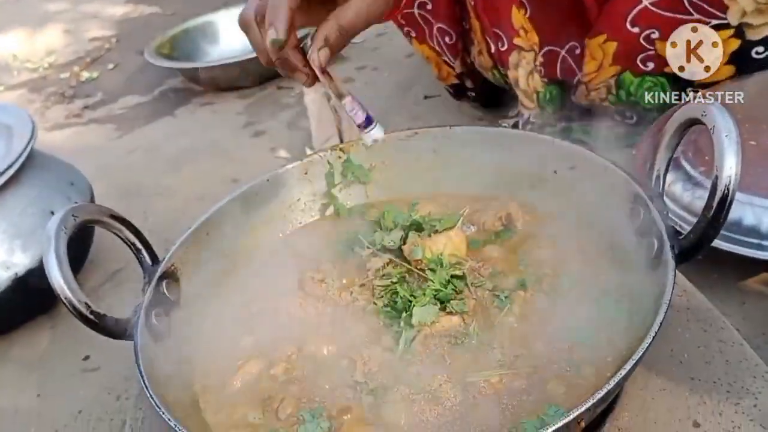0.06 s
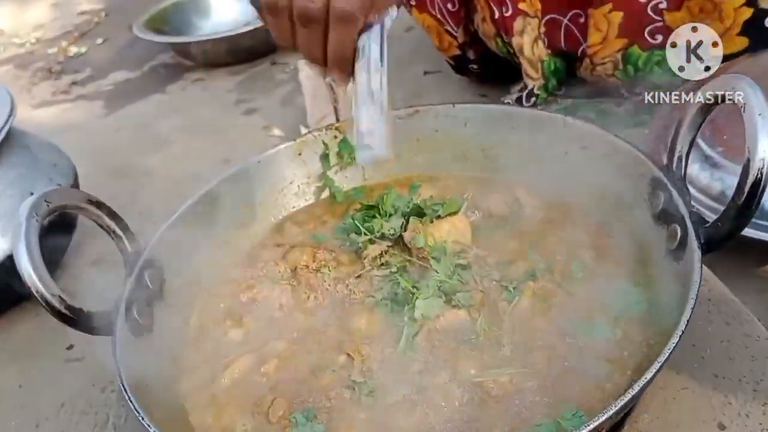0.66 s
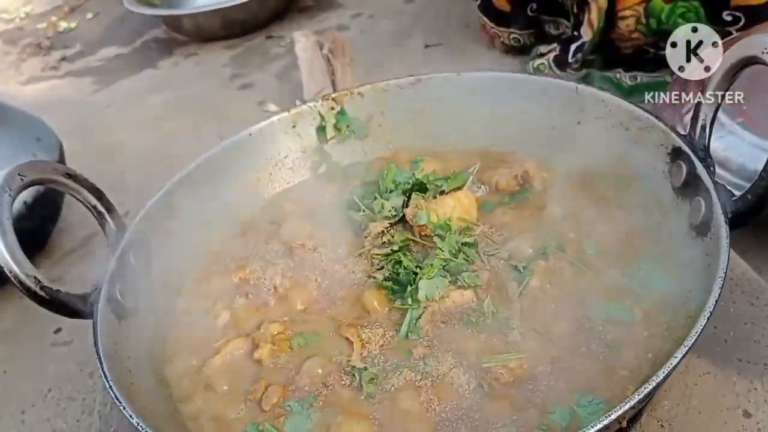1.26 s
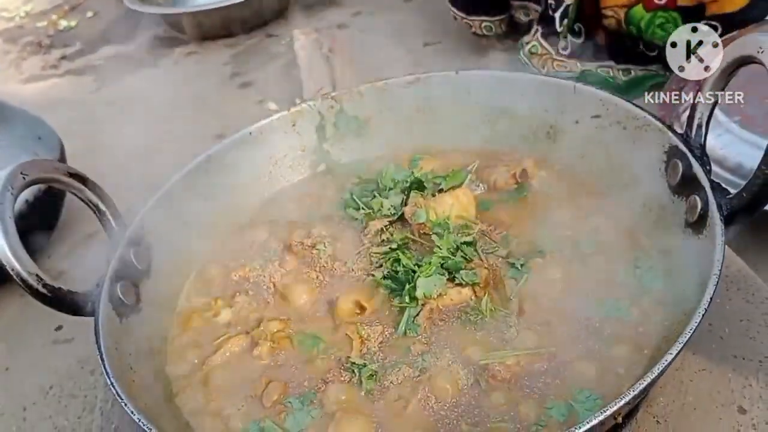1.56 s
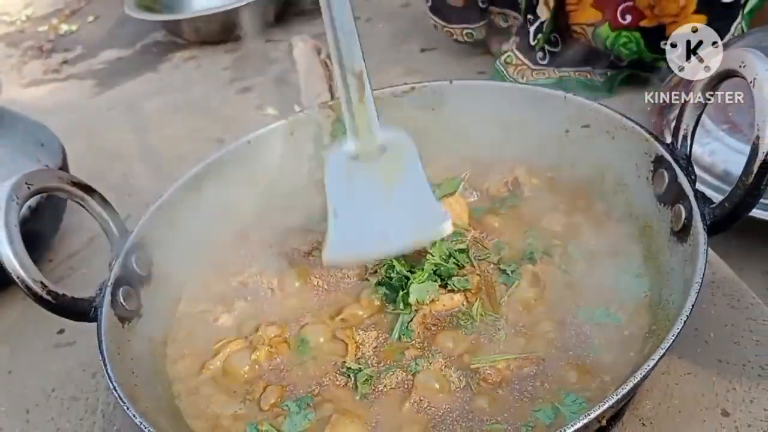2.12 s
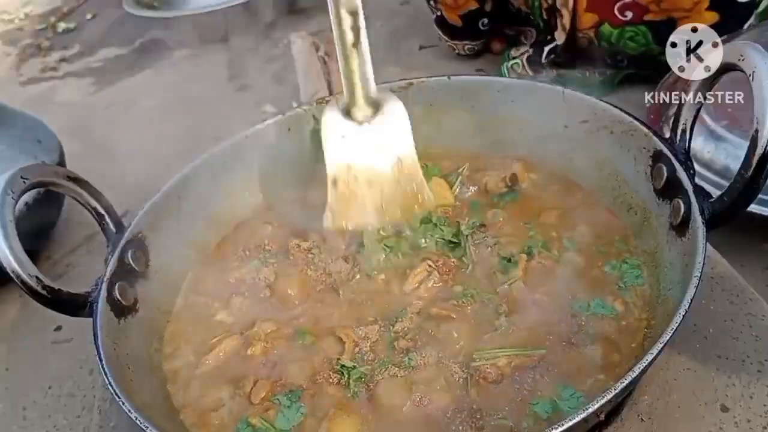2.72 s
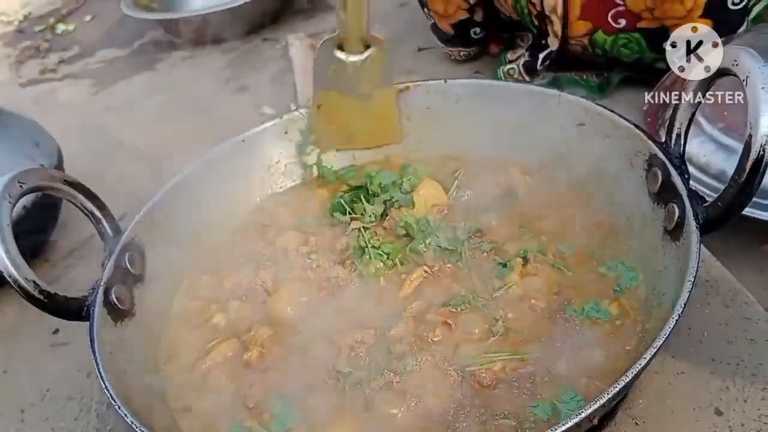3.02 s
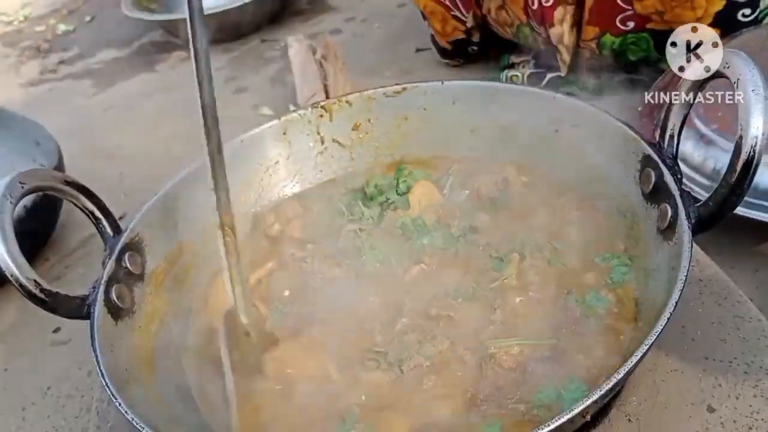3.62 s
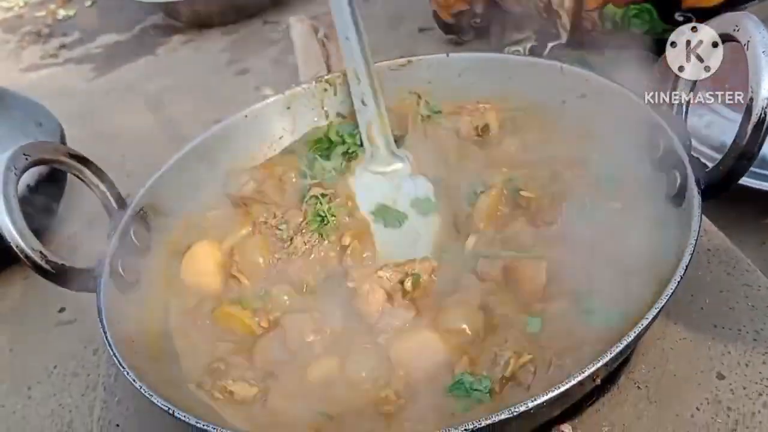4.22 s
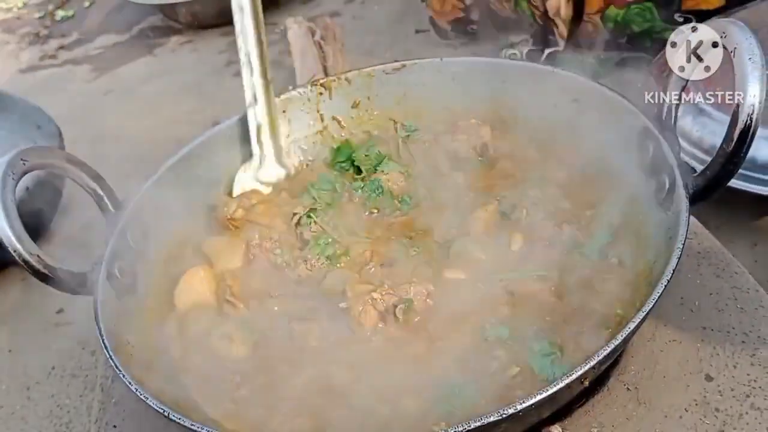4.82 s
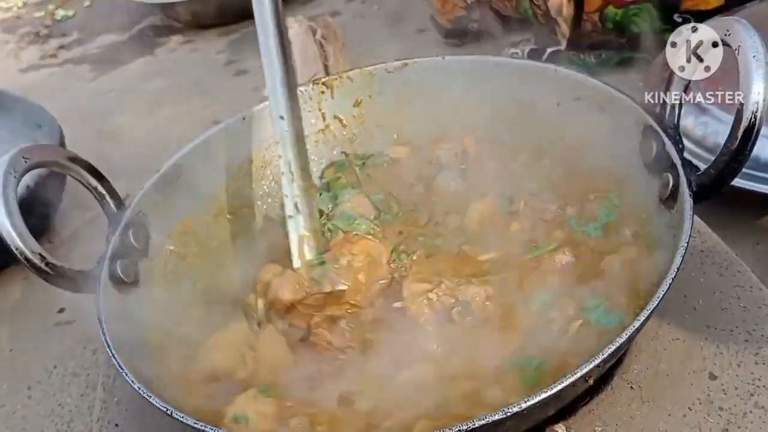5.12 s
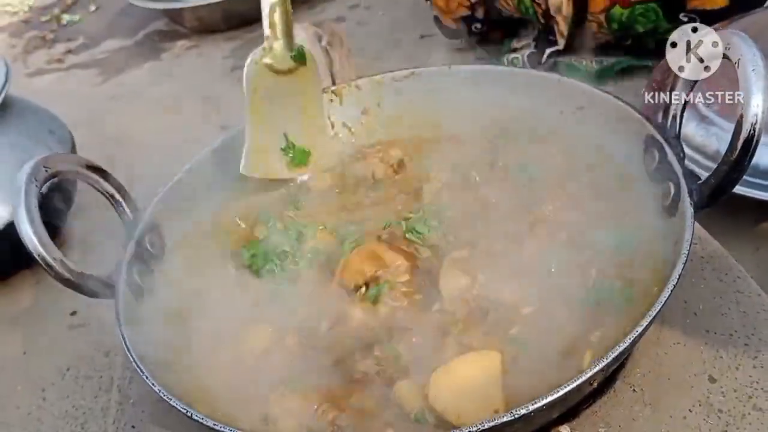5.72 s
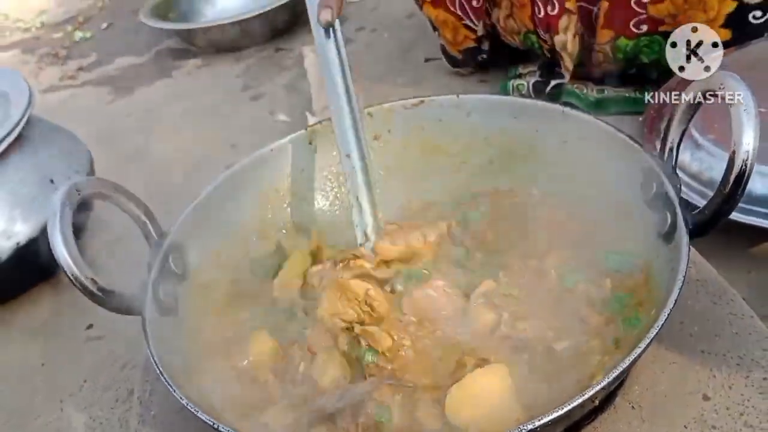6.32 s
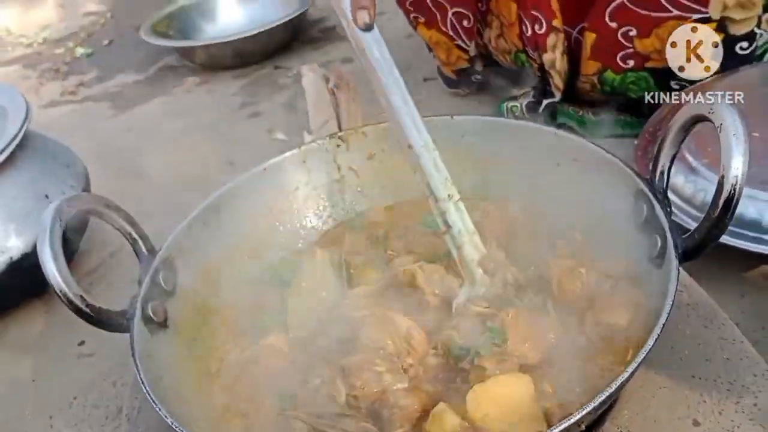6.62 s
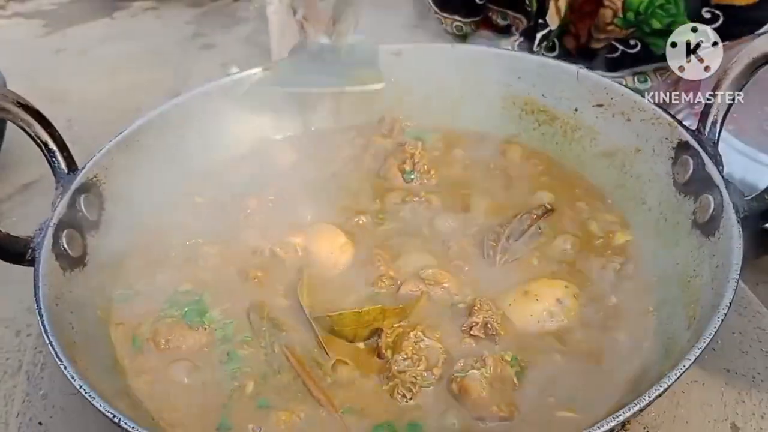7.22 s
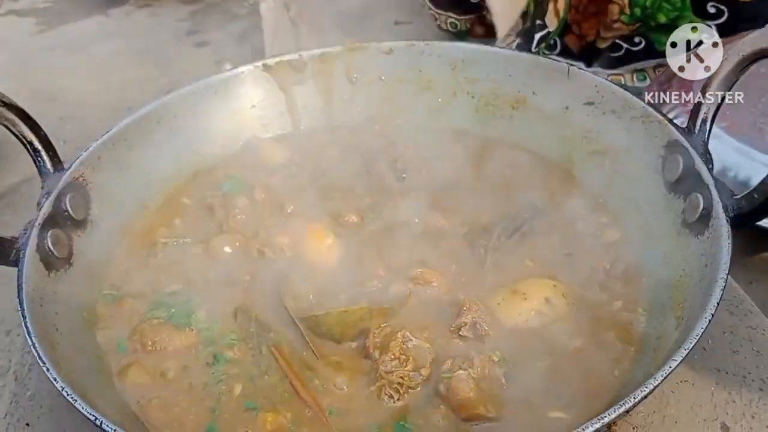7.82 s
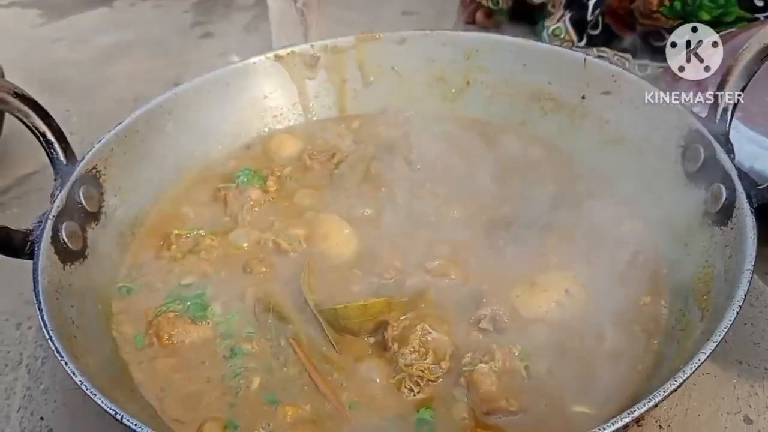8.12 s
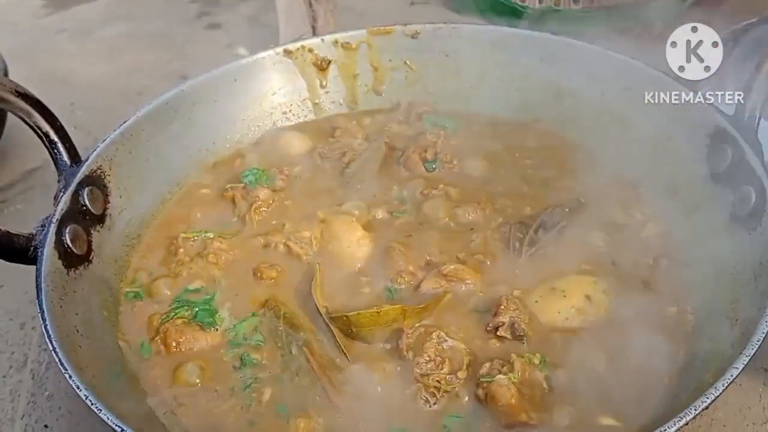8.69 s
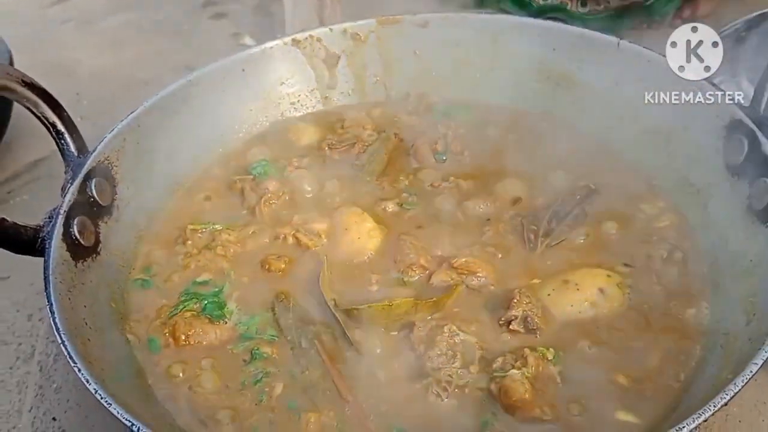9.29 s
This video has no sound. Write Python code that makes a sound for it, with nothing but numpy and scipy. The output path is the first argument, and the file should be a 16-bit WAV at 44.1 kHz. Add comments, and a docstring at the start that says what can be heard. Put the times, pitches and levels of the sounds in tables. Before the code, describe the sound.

Close outdoor boiling of curry, with wet pops, scraping spatula strokes and a few ringing clanks on the pan before it settles.

```python
"""Outdoors, close to a metal pan of thick, boiling curry: bubbles pop, steam glugs and fat sizzles.
A foil spice sachet crinkles, then a steel spatula scrapes through the curry until the boil settles.
The spatula is knocked and dragged on the rim, its blade rings on, and a quiet simmer remains.
Each bubble is a tiny tone that swells and dies; the metal rings with several fading tones at once."""
import sys
import numpy as np
from scipy import signal
from scipy.io import wavfile
from scipy.ndimage import uniform_filter1d, map_coordinates

SR = 44100
rng = np.random.default_rng(int(sys.argv[2]) if len(sys.argv) > 2 else 0)


def wrap_up_sound(samples):
    """Save the sound to the file named by the first command line argument, as 16-bit audio."""
    columns = np.atleast_2d(samples).T
    # keep every value between -1 and 1, then stretch to whole-number steps
    tamed = np.clip(columns, -1, 1)
    steps = np.round(tamed * 32767).astype(np.int16)
    wavfile.write(sys.argv[1], SR, steps)


N = 421155
TIME = np.arange(N) / SR


def gain_of(db):
    """Turns decibels into a number to multiply a sound by."""
    return 10 ** (np.asarray(db) / 20)


def evened(x):
    """Scales a sound to an average (rms) level of 1."""
    return x / np.sqrt(np.mean(x ** 2) + 1e-20)


def steadied(x, span=0.22):
    """Holds the average level near 1 over every stretch of span seconds."""
    width = int(span * SR / 2)
    power = uniform_filter1d(uniform_filter1d(x ** 2, width), width)
    return x / np.sqrt(abs(power) + 1e-12)


def curves(rows):
    """Turns rows that begin with a time into one curve for each other column."""
    times, *columns = np.transpose(rows)
    return [np.interp(TIME, times, column) for column in columns]


def add(mix, start, sound):
    """Mixes a sound in at start seconds."""
    part = mix[max(round(start * SR), 0):][:len(sound)]
    part += sound[:len(part)]


def gesture(start, length, attack_s, release_s):
    """A level that rises toward 1 and dies away once length seconds are over."""
    rise = np.clip((TIME - start) / attack_s, 0, 1)
    return rise * np.exp(-np.clip((TIME - start - length) / release_s, 0, 20))


def wander(per_s):
    """A random curve that heads for a new value per_s times a second."""
    knots = rng.standard_normal(N // 16)
    return evened(np.interp(TIME * per_s, np.arange(len(knots)), knots))


def clicks(per_s, spread_db):
    """Clicks at random times, most small and a few large."""
    size = gain_of(spread_db * np.minimum(rng.exponential(1, N), 3.5))
    return size * rng.choice([-1, 1], N) * (rng.random(N) < per_s / SR)


def coloured(x, colour, tilt_db=0):
    """Filters a sound by rows of (Hz, dB); tilt_db per octave brightens it around 2 kHz."""
    octave = np.log2(abs(np.fft.fftfreq(2048, 1 / SR)) + 1)
    hz, db = np.transpose(colour)
    shape_db = np.interp(octave, np.log2(hz), db) + tilt_db * np.clip(octave - 11, -2, 2)
    log_gain = np.log(gain_of(shape_db))
    taps = np.fft.ifft(np.exp(np.conj(signal.hilbert(log_gain)))).real  # never rings ahead of a click
    return signal.oaconvolve(x, taps)[:len(x)]


def shifting(x, depth_db, width_hz, span, size=512):
    """Bands of pitch swell and fade every span seconds as gaps and cavities change shape."""
    frames = dict(nperseg=size, noverlap=size * 3 // 4)
    hz, t, spectrum = signal.stft(x, SR, **frames)
    grid = np.meshgrid(hz / width_hz, t / span, indexing="ij")
    patches = map_coordinates(rng.standard_normal((120, 240)), grid, order=1, mode="wrap")
    spectrum = spectrum * gain_of(depth_db * np.clip(evened(patches), -2, 1.8))
    return signal.istft(spectrum, SR, **frames)[1][:len(x)]


def resonate(x, hz, width_hz):
    """Keeps the part of a sound near the moving pitch hz."""
    turn = np.exp(2j * np.pi * np.cumsum(hz) / SR)
    decay = np.exp(-np.pi * width_hz / SR)
    return 2 * (turn * signal.lfilter([(1 - decay) ** 2], [1, -2 * decay, decay ** 2], x / turn)).real


def resonances(peaks):
    """Turns broad peaks (Hz, width in Hz, dB) into a colour for filtering."""
    hz = np.geomspace(20, SR / 2, 600)
    power = sum(gain_of(db) ** 2 / (1 + ((hz - centre) / width) ** 2) ** 2
                for centre, width, db in peaks)
    return np.transpose([hz, 10 * np.log10(power)])


def ring(tones, length=.5):
    """Fading tones, struck a little differently each time; t60 is the seconds to fade by 60 dB."""
    t = TIME[:int(length * SR)]
    return sum(gain_of(db + 2 * rng.standard_normal() - 60 * t / t60)
               * np.sin(2 * np.pi * hz * t) * rng.choice([-1, 1]) for hz, db, t60 in tones)


def answer(x, response, db):
    """The ringing or echo that a sound sets off, given the response to one click."""
    return gain_of(db) * signal.oaconvolve(x, response / np.linalg.norm(response))[:N]


def reflected(x, echo_db, t60, count=60):
    """Adds quick reflections between the walls of the pan and the ground."""
    delay = rng.uniform(0.00092, .04, count)
    echoes = np.zeros(SR // 8)
    echoes[(delay * SR).astype(int)] = rng.choice([-1, 1], count) * gain_of(-60 * delay / t60)
    return x + answer(x, echoes, echo_db)


def crack(colour, t60, tilt_db=0, uneven_db=3, rise_s=0.00076):
    """A burst of noise that dies quickly, coloured a little differently each time."""
    t = TIME[:SR // 3]
    noise = shifting(rng.standard_normal(2 * len(t)), uneven_db, width_hz=263, span=0.27)
    noise = evened(coloured(noise, colour, tilt_db)[len(t):])
    return noise * gain_of(-60 * t / t60) * (1 - np.exp(-t / rise_s))


def snaps(rows, colour, t60, level_db):
    """One short crack for each row of (seconds, dB)."""
    out = np.zeros(N)
    for start, db in rows:
        add(out, start, gain_of(db + level_db) * crack(colour, t60))
    return out


def bubble(hz, length, glide=0.043, roundness=2):
    """A bursting bubble swells, rings a few cycles and rises in pitch as it opens."""
    peak_s = length * np.sqrt(roundness / 8)
    age = np.arange(int(8 * length * SR)) / (SR * peak_s)  # 1 at the loudest moment
    pitch = hz * (1 + glide * (np.minimum(age, 6) - 1.5))
    swell = (age * np.exp(1 - age)) ** roundness
    return swell * np.sin(2 * np.pi * (np.cumsum(pitch) / SR + rng.random()))


def swarm(low_hz, high_hz, cycles, per_s, spread_db, clump_db, clumps_per_s,
          scatter=.15, sway=.22, roundness=2, sizes=40):
    """Bubbles burst in clumps; their size drifts together (sway) and varies one by one (scatter)."""
    bursts = clicks(per_s, spread_db) * gain_of(clump_db * np.clip(wander(clumps_per_s), -2, 1.6))
    smallness = .5 + sway * wander(clumps_per_s) + scatter * rng.standard_normal(N)
    kind = np.floor(smallness * sizes)
    moments = np.flatnonzero(bursts)
    out = np.zeros(N + SR)
    for k, hz in enumerate(np.geomspace(low_hz, high_hz, sizes)):
        blip = hz * bubble(hz, cycles * rng.uniform(0.44, 2.02) / hz, roundness=roundness)
        starts = moments[kind[moments] == k]
        samples = starts[:, None] + np.arange(len(blip))
        np.add.at(out, samples.ravel(), np.outer(bursts[starts], blip).ravel())
    return out[:N]


# The colour (balance of low and high) of the air. Each row: pitch in Hz, relative level in dB.
AIR_COLOUR = [(20, -15), (60, -12), (130, 9.5), (400, 1), (1000, -7), (2500, -14), (5000, -47.5),
              (10000, -41), (16000, -46.5)]
def still_air():
    """The faint, low hush of outdoor air."""
    return gain_of(-66) * evened(coloured(rng.standard_normal(N), AIR_COLOUR))


# Creases snapping. Each row: start in seconds, relative level in dB.
FOIL_SNAPS = [(.0483, -21.5), (.078, -19), (.1441, -17.5), (.1994, -12.5), (.2543, -15.5), (.2922, -18.5),
              (.376, -17), (.408, -16), (.575, -29), (.5811, -12.5), (.604, -9), (.663, -24), (.675, -13),
              (.7103, -14.5), (.853, -15.5)]
# The colour of the foil. Each row: pitch in Hz, relative level in dB.
FOIL_COLOUR = [(200, -38), (500, 9), (1500, 24.5), (3500, 11.5), (7500, 19.5), (11000, -6), (15000, -35)]
def sachet():
    """Thin foil snaps at its creases and rustles finely while it is shaken empty."""
    creases = clicks(per_s=1400, spread_db=9) * gain_of(5.3 * wander(68.6))
    creases = reflected(creases, echo_db=-9, t60=0.081)
    shake = gesture(start=0.2, length=0.647, attack_s=0.022, release_s=0.036)
    rustle = shake * steadied(coloured(creases, FOIL_COLOUR, tilt_db=1))
    return snaps(FOIL_SNAPS, FOIL_COLOUR, t60=0.028, level_db=-1.5) + gain_of(-41.5) * rustle


# Spits of fat. Each row: start in seconds, relative level in dB.
FAT_SPITS = [(1.2585, -23), (1.268, -33), (1.8377, -24), (2.0178, -25), (2.6569, -23), (2.9327, -34),
             (3.1607, -27.5), (3.235, -25.5), (3.9968, -33), (4.03, -27.5), (4.2188, -20), (4.297, -20),
             (5.6057, -27.5), (5.66, -26.5)]
def spitting_fat():
    """Hot fat spits in single bright snaps."""
    colour = [(200, -39), (800, 5), (2500, 6.5), (4300, -7.5), (6000, 7.5), (7700, 2),
              (10000, -18), (13000, -44)]
    return snaps(FAT_SPITS, colour, t60=0.026, level_db=5.5)


# The colour of the sizzle. Each row: pitch in Hz, relative level in dB.
SIZZLE_COLOUR = [(800, -45), (2000, -22.5), (3300, -2), (4300, -15), (5000, -0.5), (5900, 4.5), (6600, -6),
                 (7500, 8), (8500, -12), (10500, -15), (12500, -43.5), (15000, -44)]
def sizzling_fat():
    """Thousands of tiny, high bubbles blur into a sizzle."""
    fizz = swarm(2070, 15800, cycles=4.6, per_s=2100, spread_db=9, clump_db=5, clumps_per_s=80,
                 scatter=.25, sway=.1, roundness=3)
    return steadied(coloured(reflected(fizz, echo_db=-3, t60=0.092), SIZZLE_COLOUR))


# The colours of gurgle and rumble. Each row: pitch in Hz, relative level in dB.
GURGLE_COLOUR = [(180, -20.5), (280, -12), (370, -4.5), (520, 2.5), (800, 6), (1500, -49)]
RUMBLE_COLOUR = [(20, -27), (55, -7.5), (100, 1.5), (170, -7), (250, 0.5), (500, -27.5), (2000, -83.5)]
# Surges of sauce. Each row: start and length in seconds, gurgle and rumble levels in dB.
SAUCE_SURGES = [(0.31, 0.12, -39, -46), (0.7, 0.2, -35.5, -49), (1.496, 0.28, -40, -46),
                (1.852, 0.16, -39, -69), (2.446, 0.18, -46, -50), (2.74, .28, -47.5, -47.5),
                (3.19, 0.08, -37, -51), (3.767, 0.27, -36.5, -62), (4.167, 0.083, -32, -62),
                (4.246, 0.13, -32, -37), (4.403, .16, -50, -46.5), (4.742, 0.14, -33, -68),
                (6.17, 0.07, -71, -42), (6.407, 0.074, -38.5, -49), (6.796, 0.1, -39, -51)]
def heaving_sauce(gurgle_db, rumble_db):
    """Low bubbles gurgle and rumble, louder when the sauce heaves or slops back into a gap."""
    gurgle_power, rumble_power = gain_of(gurgle_db) ** 2, gain_of(rumble_db) ** 2
    for start, length, slop_db, heave_db in SAUCE_SURGES:
        swell = gesture(start, length, attack_s=0.038, release_s=0.0087)
        gurgle_power += (gain_of(slop_db) * swell) ** 2
        rumble_power += (gain_of(heave_db) * swell) ** 2
    gurgle = swarm(280.6, 874, cycles=2.87, per_s=450, spread_db=3.5, clump_db=2, clumps_per_s=30)
    rumble = swarm(35, 290, cycles=2.23, per_s=220, spread_db=3, clump_db=3.5, clumps_per_s=17)
    return (np.sqrt(gurgle_power) * steadied(coloured(gurgle, GURGLE_COLOUR))
            + np.sqrt(rumble_power) * steadied(coloured(rumble, RUMBLE_COLOUR)))


# Hollows in the sauce. Each row: start and length in seconds, level in dB, pitch in Hz.
SAUCE_HOLLOWS = [(.62, .25, -45, 406), (1.72, .4, -34, 768), (1.868, 0.12, -37, 350),
                 (2.136, .07, -42, 338), (2.617, 0.083, -47, 402), (2.82, .05, -44, 444),
                 (2.954, .06, -43.5, 430), (3.79, 0.12, -43, 350), (4.238, 0.18, -45, 410),
                 (4.453, 0.046, -42, 350)]
def hollows():
    """Pockets under the thick sauce ring low as it sputters over them."""
    out, sputter = np.zeros(N), clicks(per_s=500, spread_db=4.5)
    for start, length, db, hz in SAUCE_HOLLOWS:
        bursts = sputter[int(start * SR):][:SR]
        tone = steadied(resonate(bursts, np.full(len(bursts), hz), width_hz=82), span=0.18)
        swell = gesture(0, length, attack_s=0.032, release_s=.015)[:len(bursts)]
        add(out, start, gain_of(db) * tone * swell)
    return out


# The colour of the splutter. Each row: pitch in Hz, relative level in dB.
SPLUTTER_COLOUR = [(250, -21), (550, 0.5), (900, 7), (1800, 5.5), (2600, -1), (3400, -5.5), (4300, -19),
                   (6000, -16.5), (8000, -18), (11000, -41)]
def spluttering():
    """Films tear and droplets land: wet ticks too short to have a pitch."""
    ticks = swarm(900, 6000, cycles=1, per_s=1500, spread_db=6, clump_db=6, clumps_per_s=85,
                  scatter=.25, sway=.05, roundness=4)
    return steadied(coloured(reflected(ticks, echo_db=-12.5, t60=0.05), SPLUTTER_COLOUR))


# The colour of the simmer. Each row: pitch in Hz, relative level in dB.
SIMMER_COLOUR = [(300, -41), (750, 11.5), (1200, -2), (1700, -10), (2200, -13.5), (2700, -6.5), (3500, -17),
                 (6000, -22.5), (11000, -78)]
def simmering():
    """A weak boil makes only clusters of small, round blips."""
    blips = swarm(700, 3200, cycles=4.5, per_s=300, spread_db=4.5, clump_db=5, clumps_per_s=22,
                  scatter=.2, sway=.15, roundness=4)
    return steadied(coloured(reflected(blips, echo_db=-22.5, t60=0.12), SIMMER_COLOUR), span=0.36)


# The colour of the boil. Each row: pitch in Hz, relative level in dB.
BOIL_COLOUR = [(300, -29), (450, -22.5), (600, 3.5), (780, 10.5), (1200, 3.5), (1800, -4), (2400, 1),
               (3300, -15.5), (4200, -10.5), (6000, -62.5), (11000, -96.5)]
# How dense the boil is. Each row: time in seconds, the burble's share of the power from 0 to 1.
DENSE_SHARE = [(0, 0.75), (1.5, 0.79), (3, 0.72), (4.5, 0.25), (5.6, 0.12), (7, 0.067)]
def boiling():
    """A dense, wet burble slowly gives way to looser bubbles."""
    burble = swarm(416, 3660, cycles=1.78, per_s=1900, spread_db=7.5, clump_db=3, clumps_per_s=73,
                   scatter=.26, sway=.06)
    burble = shifting(reflected(burble, echo_db=-8.5, t60=0.086), depth_db=9, width_hz=266, span=.035)
    loose = swarm(382, 4410, cycles=3.94, per_s=1100, spread_db=4, clump_db=15, clumps_per_s=60,
                  scatter=.16, sway=.16)
    loose = reflected(loose, echo_db=-9, t60=0.082)
    share = curves(DENSE_SHARE)[0]
    return (np.sqrt(share) * steadied(coloured(burble, BOIL_COLOUR))
            + np.sqrt(1 - share) * steadied(coloured(loose, BOIL_COLOUR)))


def steam_spurts(depth_db=2.6, per_s=24):
    """A level that wavers around 1, as steam escapes in spurts with lulls between them."""
    return steadied(gain_of(depth_db * np.clip(wander(per_s), -2, 1.6)), span=.4)


# How hard the pan cooks: it boils, is stirred down and settles to a simmer.
# Each row: time in seconds, then relative levels of bubbling, gurgle and sizzle in dB.
COOKING_LEVELS = [(0, -29, -37, -43.5), (.25, -36.5, -42, -41.5), (.38, -31.5, -37.5, -40.5),
                  (.85, -32.5, -36.5, -44), (1.3, -31, -38.5, -46), (1.65, -37.5, -57, -53),
                  (1.85, -30, -45, -43), (2.2, -35, -57, -45), (2.42, -32.5, -61, -49.5),
                  (2.68, -31, -52, -48.5), (3.2, -32, -53.5, -43), (4.1, -34, -52, -50),
                  (4.3, -30, -64, -42), (4.65, -33.5, -48.5, -47.5), (5.6, -38, -52.5, -45),
                  (5.92, -39, -60.5, -52), (6.86, -37.5, -58, -43), (6.97, -55, -64, -55),
                  (8.4, -63.5, -73.5, -71), (9.55, -59.5, -65, -61.5)]
def cooking(blade_moving, smothered_share=0.42, full_boil_db=-32):
    """Blends the sounds of the boil; the moving blade puts out part of the bubbling and sizzle."""
    bubbling_db, gurgle_db, sizzle_db = curves(COOKING_LEVELS)
    calm = np.clip((-42 - bubbling_db) / 8, 0, 1)  # 0 is a boil, 1 is a simmer
    bubbles = np.sqrt(1 - calm) * boiling() + np.sqrt(calm) * simmering()
    bubbles = gain_of(bubbling_db) * (gain_of(0.33) * bubbles + gain_of(-7) * spluttering())
    sauce = heaving_sauce(gurgle_db, rumble_db=-55.5 + 0.59 * (bubbling_db - full_boil_db))
    sizzle = gain_of(sizzle_db) * sizzling_fat() * steam_spurts()
    undisturbed = np.sqrt(1 - smothered_share * blade_moving)
    return undisturbed * steam_spurts() * (bubbles + sizzle) + sauce


# The pan's thin metal tones. Each row: pitch in Hz, relative level in dB, undamped fade time in seconds.
METAL_TONES = [(790, -13, .07), (1172, -17, .06), (1625, -4, .07), (1733, -16, .09), (2104, -3, .09),
               (2616, -10, .1), (2765, -7, .08), (3143, -7, .05), (3256, -9, .05), (3736, -27, .12),
               (3858, -15, .06), (4377, -13, .07), (5511, -16, .07), (6245, -14, .07), (6982, -15, .06),
               (7600, -14, .06), (8484, -23, .06), (10480, -29, .15)]
def in_pan(x, fade_share=0.29):
    """What cooks in the pan also rings its metal, and the curry cuts that ringing short."""
    damped = ring([(hz, db / 2, t60 * fade_share) for hz, db, t60 in METAL_TONES], length=.1)
    return x + answer(x, damped, db=-12)


def lesser_bubbles(per_s=10, count=400):
    """Rows for pops(): bubbles that come by chance, as loud as the boil allows."""
    times = np.cumsum(rng.gamma(2, .5, count)) / per_s
    force, pitch, ringing = np.clip(rng.standard_normal((count, 3)), -2, 2).T
    db = np.interp(times, TIME, curves(COOKING_LEVELS)[0]) + 8.5 + 3.5 * force
    hz = 1250 * 2 ** (0.26 * pitch)
    cycles = 3.23 * 2 ** (.25 * ringing)  # about the same for all, so large, low ones last longer
    return np.transpose([times, db, hz, cycles / hz])[times < TIME[-1]]


# Big, slow pockets of steam under the sauce, and the bubbles that stand out on top.
# Each row: time of the peak in seconds, level in dB, pitch in Hz, rough length in seconds.
STEAM_GLUGS = [(.1, -39, 158, 0.018), (.79, -25, 386, 0.009), (1.945, -32, 383, 0.012),
               (2.2, -27, 770, 0.0068), (3.11, -36, 234, 0.013), (3.85, -29.5, 374, 0.0082),
               (4.365, -52, 260, 0.0045), (4.49, -32, 330, 0.011), (6.443, -21.5, 573, 0.01)]
LOUD_BUBBLES = [(0.0773, -8.5, 2100.0, 0.0011), (0.1197, -16.5, 1020, 0.0033), (0.1393, -17, 1840, 0.0028),
                (0.2015, -31, 1410, 0.0034), (0.2133, -15, 1460, 0.0017), (0.3015, -21, 1470, 0.0047),
                (0.3118, -12, 1040, 0.0023), (0.3305, -21.5, 890.0, 0.0025), (0.3832, -15, 1120, 0.002),
                (0.449, -15, 1470.0, 0.0034), (0.4793, -14, 1710.0, 0.0012), (0.507, -14, 1120, 0.0017),
                (0.6054, -18, 2320, 0.0018), (0.6364, -13.5, 1830.0, 0.0016), (0.6727, -13, 1980, 0.0024),
                (0.7846, -12, 1260, 0.0013), (0.8017, -12, 2100, 0.0042), (0.8566, -10, 1400.0, 0.0017),
                (0.8896, -14, 1530, 0.0017), (0.8975, -14.5, 1630, 0.0032), (1.0176, -13.5, 1770.0, 0.0031),
                (1.1466, -16, 1580, 0.0028), (1.2493, -16.5, 1170, 0.0017), (1.2612, -9.5, 1860, 0.0033),
                (1.2688, -3.5, 1820, 0.00096), (1.283, -16, 1900, 0.002), (1.345, -21.5, 1050, 0.004),
                (1.4407, -15, 1480, 0.0031), (1.4764, -11.5, 1060, 0.004), (1.5357, -12.5, 1130, 0.0029),
                (1.5461, -11.5, 1920, 0.0034), (1.5601, -19, 820.0, 0.0066), (1.7778, -13.5, 1350, 0.0015),
                (1.8391, -23, 1680, 0.0058), (1.9255, -15, 930.0, 0.0023), (1.94, -13.5, 950, 0.003),
                (1.9538, -24, 810, 0.011), (1.969, -23, 840, 0.011), (2.0647, -25, 930, 0.0038),
                (2.1506, -17, 1160, 0.0037), (2.1634, -15, 1030, 0.0045), (2.1781, -15.5, 1000, 0.0049),
                (2.2019, -14.5, 1530, 0.0025), (2.292, -14, 1320.0, 0.0013), (2.3095, -18, 1680, 0.0037),
                (2.4117, -12.5, 1250, 0.0033), (2.43, -12.5, 2450, 0.0019), (2.4823, -23, 730.0, 0.0071),
                (2.5627, -5, 1540, 0.0015), (2.6844, -16.5, 1870, 0.0015), (2.6997, -16.5, 1630, 0.0035),
                (2.7332, -19, 1670, 0.005), (2.793, -14, 1970, 0.0018), (2.8492, -15, 1680, 0.0018),
                (2.8631, -13.5, 1240, 0.0015), (2.9247, -18.5, 1550, 0.0032), (2.9428, -10.5, 1710, 0.0035),
                (3.0172, -11, 1590.0, 0.0038), (3.0919, -15.5, 1540, 0.0033),
                (3.2102, -13.5, 1630.0, 0.0022), (3.3544, -15.5, 1690, 0.0045), (3.3724, -13, 1540, 0.0024),
                (3.4101, -18, 2100, 0.0035), (3.6628, -30, 1730, 0.004), (3.6719, -19, 1690, 0.0072),
                (3.7963, -23, 1750, 0.0059), (3.8081, -20, 2050, 0.0031), (3.8341, -17, 1780, 0.0027),
                (3.8857, -16.5, 1320, 0.0028), (4.0984, -14.5, 1550, 0.0026), (4.1291, -12.5, 1080, 0.0037),
                (4.179, -18.5, 770.0, 0.0046), (4.1984, -9, 1340.0, 0.0021), (4.209, -16, 1360, 0.0015),
                (4.2258, -9, 1750, 0.0029), (4.2694, -7.5, 1170, 0.0024), (4.3188, -21.5, 1510, 0.013),
                (4.3515, -8.5, 1600.0, 0.002), (4.372, -19.5, 1480, 0.0014), (4.4978, -16, 1700, 0.0029),
                (4.5958, -17.5, 1020, 0.0019), (4.6044, -7.5, 2250, 0.0019), (4.6814, -16.5, 1264, 0.0072),
                (4.8461, -17, 1410, 0.0015), (4.858, -20, 1970, 0.0018), (4.8787, -14.5, 1140, 0.0021),
                (5.002, -13, 1000, 0.0035), (5.08, -13, 1530, 0.0014), (5.1187, -18, 1120, 0.0014),
                (5.2084, -15.5, 1140, 0.0041), (5.3434, -11.5, 1970, 0.0023), (5.3586, -8, 2020, 0.0024),
                (5.4003, -12, 1930, 0.0023), (5.5164, -17.5, 1140, 0.0053), (5.5563, -6, 1860, 0.0022),
                (5.7372, -21.5, 1850, 0.0032), (5.7587, -14.0, 2170.0, 0.0027),
                (5.7828, -10.5, 1590, 0.0026), (5.8049, -8, 2600, 0.00069), (5.92, -24.5, 1410, 0.006),
                (6.0223, -24, 1530, 0.0056), (6.0365, -15, 2660, 0.0016), (6.155, -20.5, 880, 0.0061),
                (6.2195, -2, 1770, 0.0019), (6.2425, -15, 1290, 0.0035), (6.2495, -11, 2240, 0.0015),
                (6.288, -15.5, 1610, 0.0012), (6.339, -4, 1443, 0.00147), (6.415, -14, 1010, 0.0014),
                (6.4526, -5.5, 1125, 0.0021), (6.623, -19, 960, 0.0033), (6.6409, -11.5, 1720, 0.0014),
                (6.7183, -20, 1730, 0.004), (6.7278, -19.5, 1770, 0.0037), (6.8003, -20, 840.0, 0.0056),
                (6.8522, -20, 1480, 0.0024), (6.8982, -14, 1360, 0.0022), (6.9063, -14, 2600, 0.0016),
                (7.0141, -37, 950, 0.0048), (7.0283, -35, 945, 0.0041), (7.041, -34, 950, 0.0032),
                (7.0543, -29, 1636, 0.011), (7.1042, -20, 2970, 0.0015), (7.1938, -26.5, 1750, 0.0029),
                (7.6759, -37, 1710, 0.004), (8.3778, -32.5, 1880, 0.0015), (8.4217, -31.5, 1620.0, 0.0016),
                (8.4327, -31.5, 2160.0, 0.0018), (8.4654, -43, 1700, 0.0041), (8.4866, -31.5, 1760, 0.008),
                (8.5344, -30.5, 1380, 0.0069), (8.543, -39, 1560, 0.0041), (8.5522, -32, 1370, 0.0051),
                (8.5792, -29, 1560, 0.0034), (8.787, -40, 2006, 0.003), (8.8302, -43, 1260, 0.0084),
                (8.9986, -20, 1940, 0.0023), (9.032, -46, 2090, 0.003), (9.0435, -38, 2050.0, 0.0043),
                (9.045, -43, 2740, 0.0064), (9.1216, -45, 2180, 0.0036), (9.127, -38.5, 2480, 0.005),
                (9.145, -40, 1390, 0.0081), (9.158, -46, 2550, 0.0075), (9.1629, -39, 1600, 0.0033),
                (9.174, -37, 1580, 0.006), (9.1801, -29, 1940.0, 0.002), (9.232, -45, 2520, 0.005),
                (9.2551, -33, 1140, 0.0043), (9.2668, -28, 1230, 0.0067), (9.276, -35, 1250, 0.004),
                (9.296, -41, 1960, 0.005), (9.309, -42, 1400, 0.0031), (9.344, -41, 1900, 0.0059),
                (9.379, -33.5, 1530, 0.0035), (9.392, -41.5, 1460, 0.003)]
def pops(rows, flutter_db, tear_s=.0006):
    """Each large bubble flutters as its skin thins, tears with a tick and echoes briefly in the pan."""
    out = np.zeros(N)
    for peak_s, db, hz, length in rows:
        length = max(length, 2 / hz)  # at least two cycles
        force_db = db + 0.38 * min(db + 13.5, 0)  # gentle bubbles burst with less spatter
        tone = bubble(hz, length, glide=0.0043, roundness=6)
        add(out, peak_s - length * np.sqrt(3) / 2, gain_of(db) * tone)
        tick = bubble(2500 * rng.uniform(0.58, 1.135), tear_s, roundness=3)
        add(out, peak_s - tear_s, gain_of(force_db - 8) * tick)
        for when, pitch, strength in rng.uniform(-1, 1, (4, 3)):
            flutter = bubble(hz * np.exp(0.33 * pitch), 0.67 * length, roundness=3)
            add(out, peak_s + 0.01 * when, gain_of(force_db + flutter_db + 8.5 * strength) * flutter)
    return reflected(out, echo_db=-16, t60=0.091)


# The colours of the wet scrape and the higher rasp. Each row: pitch in Hz, relative level in dB.
SCRAPE_COLOUR = [(300, -24.5), (500, -29), (720, 3.5), (1100, 5.5), (1700, 4), (2100, 2), (2700, 0.5),
                 (3400, -9.5), (4200, -18.5), (6000, -24.5), (11000, -93)]
RASP_COLOUR = [(800, -41), (2000, -22), (3000, 1.5), (4100, -13), (5000, -4.5), (5900, 6.5), (6600, -1),
               (7400, 5), (8500, -9.5), (10800, -21), (12500, -48), (15000, -36)]
# Pushes through the curry. Each row: start and length in seconds, scrape and rasp levels in dB,
# first and last pitch of the hollow under the blade in Hz.
STIR_STROKES = [(3.208, 0.31, -31.5, -38.5, 1660, 1760), (3.513, 0.34, -30.5, -40, 1580, 1810),
                (3.755, 0.13, -28.5, -37.5, 1870, 1620), (4.963, 0.16, -24, -37, 1700, 1260),
                (5.085, 0.2, -30.5, -80, 1150, 1040), (5.275, 0.34, -36, -64, 2060, 2100),
                (6.113, 0.048, -27.5, -37, 1570, 2120), (6.169, 0.055, -18.5, -37, 2000, 1700),
                (6.222, 0.096, -21.5, -32, 1700, 1400), (6.309, 0.15, -20.5, -48.5, 1250, 820),
                (6.456, 0.18, -29.5, -39.5, 1900, 1910), (6.754, 0.11, -33, -28, 2100, 2210)]
def stirring():
    """The blade scrapes grittily over a ringing hollow. Gives the sound and the movement (0 to 1)."""
    moving, scrape_gain, rasp_gain, hollow_hz = np.zeros((4, N))
    for start, length, scrape_db, rasp_db, first_hz, last_hz in STIR_STROKES:
        push = gesture(start, length, attack_s=0.059, release_s=0.02) + 1e-9
        moving += push
        scrape_gain += gain_of(scrape_db) * push
        rasp_gain += gain_of(rasp_db) * push
        hollow_hz += push * np.interp(TIME, [start, start + length], [first_hz, last_hz])
    hollow_hz /= moving  # overlapping strokes share an average pitch
    grit = clicks(per_s=1900, spread_db=3) * gain_of(2.6 * wander(150))
    grit = shifting(grit, depth_db=3, width_hz=188.6, span=0.04, size=1024)
    hollow = gain_of(4.5) * resonate(grit, hollow_hz, width_hz=830)
    scrape = steadied(coloured(grit + hollow, SCRAPE_COLOUR))
    hollow_echo = np.interp(TIME - 1 / hollow_hz, TIME, grit)
    rasp = shifting(grit + 0.063 * hollow_echo, depth_db=3.5, width_hz=780, span=.12)
    rasp = steadied(coloured(rasp, RASP_COLOUR))
    return scrape_gain * scrape + rasp_gain * rasp, np.minimum(moving, 1)


# Drags along the rim. Each row: start and length in seconds, relative level in dB,
# first and last pitch of the squeal in Hz.
DRAGS = [(7.336, 0.049, -35, 1900, 2300), (7.381, 0.023, -22.5, 2280, 2830),
         (7.462, 0.072, -39, 2000, 1380), (7.791, 0.05, -28, 1590, 1640), (7.842, 0.097, -14.5, 1700, 2164)]
def rim_drags(pan_colour):
    """The blade's edge catches and lets go on the rim: it grates, squeals and rings the metal."""
    slips = clicks(per_s=1900, spread_db=1) * gain_of(2.6 * wander(250))
    slips = steadied(shifting(slips, depth_db=8, width_hz=150, span=.035, size=1024), span=0.078)
    grating = gain_of(1.5) * steadied(coloured(slips, pan_colour, tilt_db=-1.5), span=0.02)
    out, pressure = np.zeros((2, N))
    for start, length, db, first_hz, last_hz in DRAGS:
        press = gain_of(db) * gesture(start, length, attack_s=0.028, release_s=0.011)
        pitch = np.interp(TIME, [start, start + length], [first_hz, last_hz])
        squeal = gain_of(-4.5) * steadied(resonate(slips, pitch, width_hz=1200), span=.04)
        out += press * (grating + squeal)
        pressure += press
    return out + answer(slips * pressure, ring(METAL_TONES), db=-4)


# The tones of the pan's wall while the spatula presses on it. Each row: pitch in Hz, relative level in dB.
WALL_TONES = [(420, -21.5), (820, -6), (1230, -8.5), (1620, -1), (1820, 0), (2150, -3), (2400, -4),
              (3130, -1), (3850, -11.5), (4370, -6.5), (5550, -12.5), (6240, -7), (6600, -12.5),
              (7600, -11.5)]
def clank(t60, tilt_db, contact_hz):
    """The pressed wall rings briefly, most strongly near the pitch of the spot that is hit."""
    hz, db = np.transpose(WALL_TONES)
    nearness = np.exp(-(np.log2(hz / contact_hz) / 0.29) ** 2)
    db = db + tilt_db * np.log2(hz / 2000) + 7 * nearness
    hz = hz * rng.uniform(1, 1.02, len(hz))
    return ring(zip(hz, db, np.full(len(hz), t60)), length=.2)


# The pan rocking on the stove. Each row: pitch in Hz, relative level in dB, fade time in seconds.
STOVE_TONES = [(73, -11.5, 0.034), (123, -3, 0.082), (190, -3, 0.13), (252, 3, 0.11), (350, -24.5, 0.12)]
# Blows on the pan. Each row: start in seconds, clack level in dB, its fade time in seconds, clank, ring
# and thud levels in dB, tilt in dB per octave, pitch of the spot hit in Hz. All levels are relative.
SPATULA_KNOCKS = [(4.7708, -13, .04, -40.5, -51, -53.5, 1, 7300),
                  (4.7744, -8.5, 0.081, -29, -39, -51.5, 1, 6500),
                  (4.7866, -4.5, 0.026, -32.5, -36.5, -38.5, 7.5, 7260),
                  (4.8325, -15.5, 0.013, -21, -53, -48, 8.5, 3200),
                  (6.0071, -8, 0.06, -32, -46, -34, 6, 6290), (6.1985, -11.5, 0.01, -36, -36, -55, 7, 6300),
                  (7.283, -4, 0.024, -8.5, -20, -19.5, 1.5, 3120),
                  (7.3106, -13.5, 0.026, -17.5, -27, -18.5, 0, 1850),
                  (7.3257, -9, 0.04, -19, -25, -20.5, .5, 1870),
                  (7.4088, -5.5, 0.0072, -18, -25, -60, -2, 1250),
                  (7.4253, 1, 0.038, -10.5, -25.5, -16, -0.5, 1946),
                  (7.7403, -8, 0.06, -19.5, -12, -26.5, 1, 3200),
                  (7.8469, -16, .03, -19.5, -29, -38, 0.5, 1700),
                  (7.8632, -15, 0.027, -16, -29.5, -34, 2, 1660),
                  (8.1386, 5.5, 0.019, -17, -12, -13.5, -1, 1600)]
def knocks(pan_colour):
    """Each blow clacks, clanks the wall, leaves the metal ringing and rocks the pan with a thud."""
    out = np.zeros(N)
    for start, clack_db, t60, clank_db, ring_db, thud_db, tilt_db, contact_hz in SPATULA_KNOCKS:
        clack = crack(pan_colour, t60, tilt_db, uneven_db=2.5, rise_s=.0004)
        contact = crack(resonances([(contact_hz, 290, 0)]), t60, uneven_db=4.5, rise_s=0.00026)
        add(out, start, gain_of(clack_db - 2) * clack + gain_of(clack_db - 7) * contact)
        add(out, start, gain_of(clank_db) * clank(1.44 * t60, tilt_db, contact_hz))
        add(out, start, gain_of(ring_db - 5) * ring(METAL_TONES))
        add(out, start, gain_of(thud_db - 7.5) * ring(STOVE_TONES))
    return out


# The blade's tones. Each row: start in seconds, level in dB, pitch in Hz, fade time in seconds.
BLADE_TONES = [(7.93, -21.5, 2164, 0.72), (7.93, -26, 2205, .26), (8.139, -22, 2171, 0.5),
               (8.139, -32, 3736, 0.21), (8.139, -34, 3790, .1), (8.139, -27, 3246, .11)]
def ringing_blade():
    """The steel blade swings free and rings on in pure tones."""
    out, t = np.zeros(N), TIME[:SR]
    for start, db, hz, t60 in BLADE_TONES:
        add(out, start, gain_of(db - 60 * t / t60) * np.sin(2 * np.pi * hz * t))
    return out


# Broad tones of the full pan, damped by the curry. Each row: pitch and width in Hz, relative level in dB.
PAN_PEAKS = [(130, 70, -32), (251.2, 11, -6), (530, 67, -17), (770, 99, -8), (1194, 120, 1.5),
             (1630, 110, 1.5), (2100, 100, 1.5), (2467, 130, -4.5), (2660, 120, -1), (3123, 110, -2.5),
             (3830, 170, -10.5), (4284, 150, -11), (5370, 530, -12.5), (6870, 1100, -9.5),
             (7550, 1700, -21.5), (9400, 570, -26.5), (14000, 2300, -49.5)]
def spatula_on_rim():
    """Knocks and drags echo faintly from the yard while the blade rings on."""
    pan_colour = resonances(PAN_PEAKS)
    clatter = knocks(pan_colour) + rim_drags(pan_colour)
    yard = crack(pan_colour, t60=0.13, uneven_db=17.5, rise_s=0.0057)
    return clatter + answer(clatter, yard, db=-20) + ringing_blade()


def scene():
    """Everything reaches one microphone, alike in both channels."""
    scrape, blade_moving = stirring()
    curry = in_pan(cooking(blade_moving) + scrape) + hollows() + spitting_fat()
    bubbles = pops([*LOUD_BUBBLES, *lesser_bubbles()], flutter_db=-12)
    glugs = pops(STEAM_GLUGS, flutter_db=-14)
    return np.tile(still_air() + sachet() + curry + bubbles + glugs + spatula_on_rim(), (2, 1))


def record(dry, low_hz=36, high_hz=15900):
    """The hardest knocks overload the input; the deepest bass and the highest treble are cut."""
    clipped = dry / (1 + dry ** 6) ** (1 / 6)
    bass_cut = signal.sosfilt(signal.butter(2, low_hz, "highpass", fs=SR, output="sos"), clipped)
    treble_filter = signal.firwin(511, high_hz, window=("kaiser", 9), fs=SR)
    return signal.oaconvolve(bass_cut, treble_filter[None], "same")


dry = scene()
out = record(dry)
wrap_up_sound(out)
```